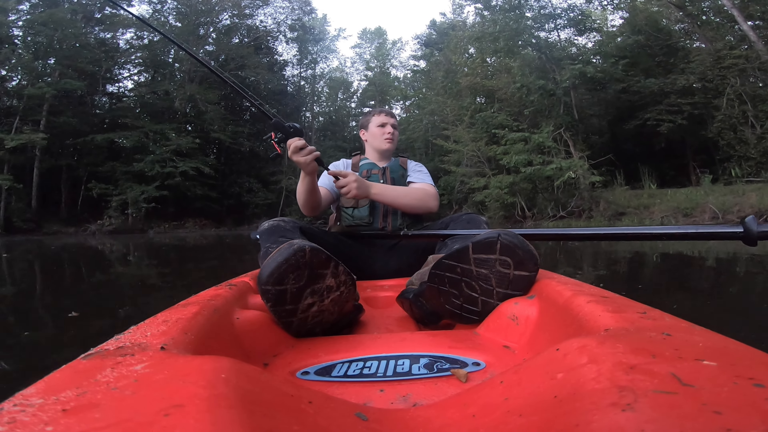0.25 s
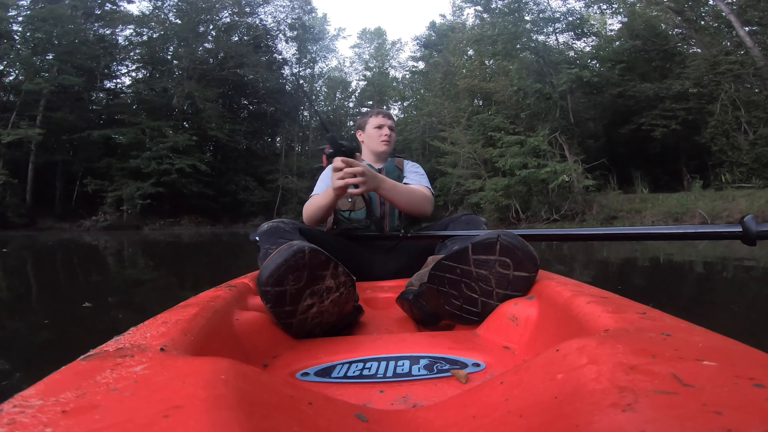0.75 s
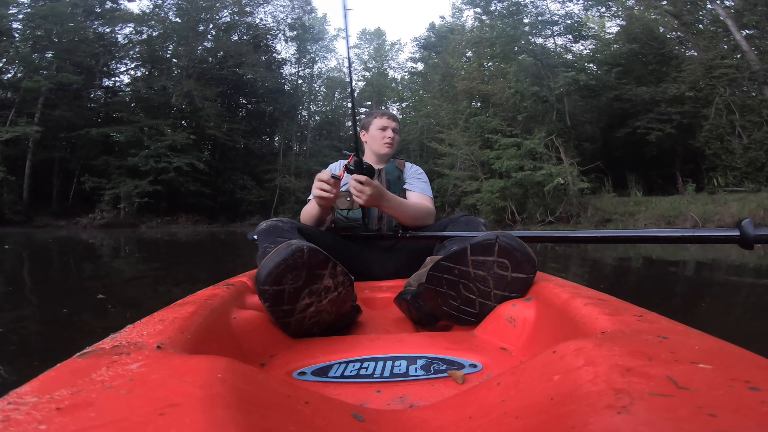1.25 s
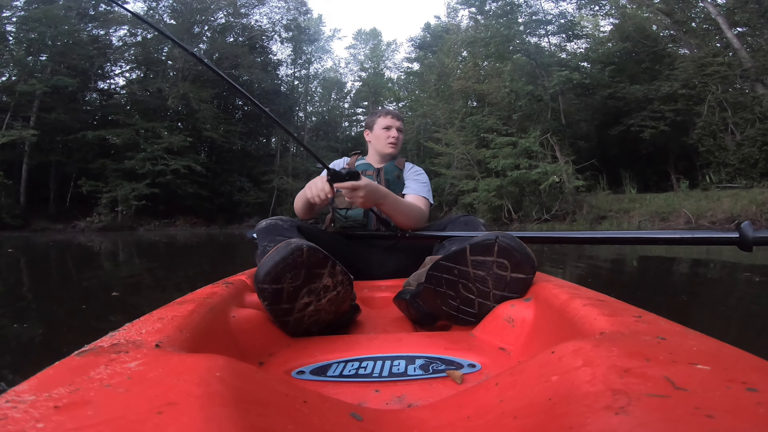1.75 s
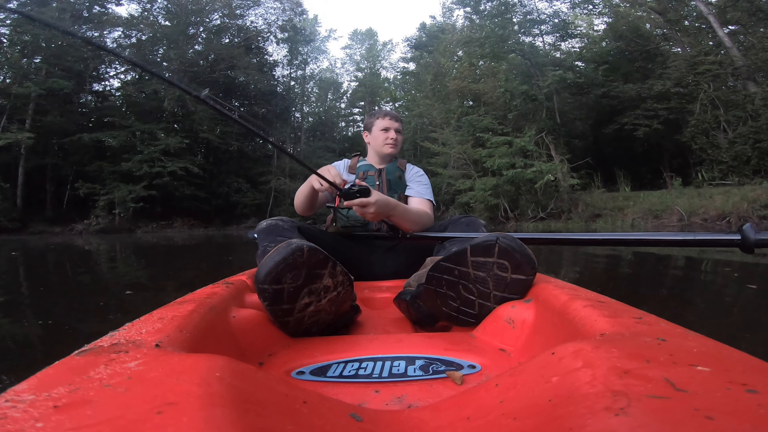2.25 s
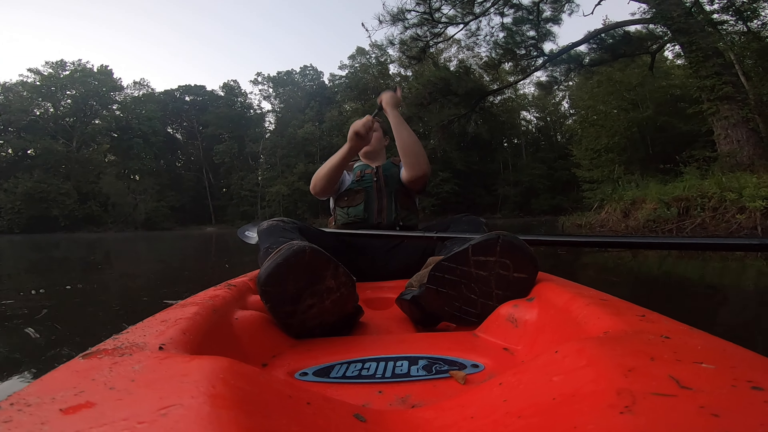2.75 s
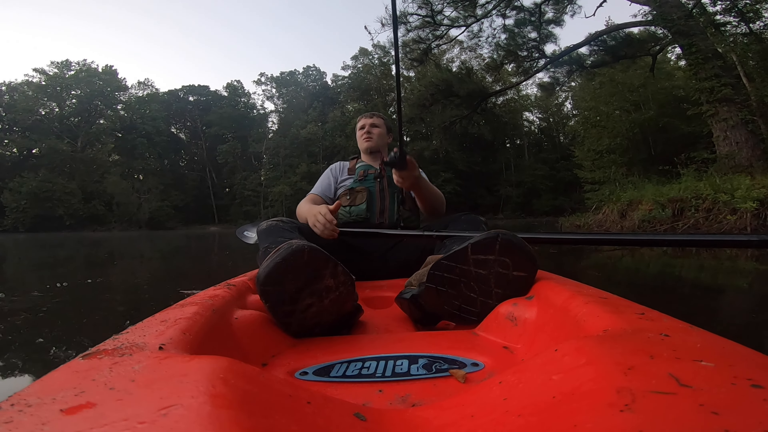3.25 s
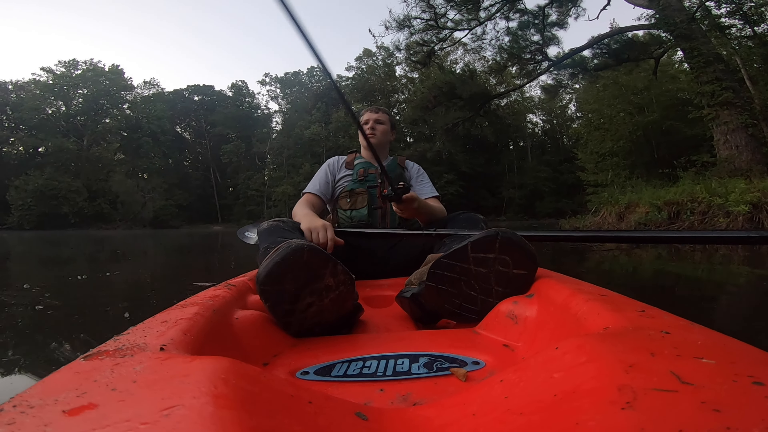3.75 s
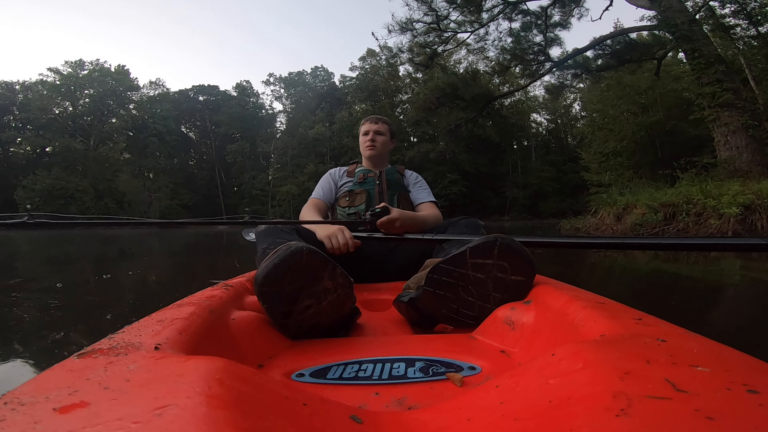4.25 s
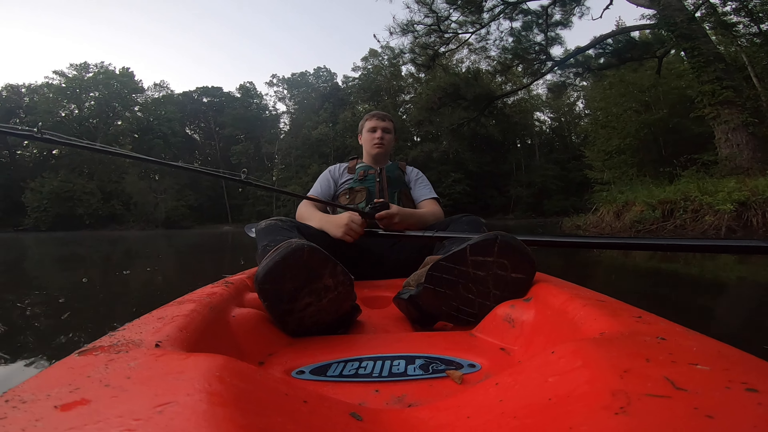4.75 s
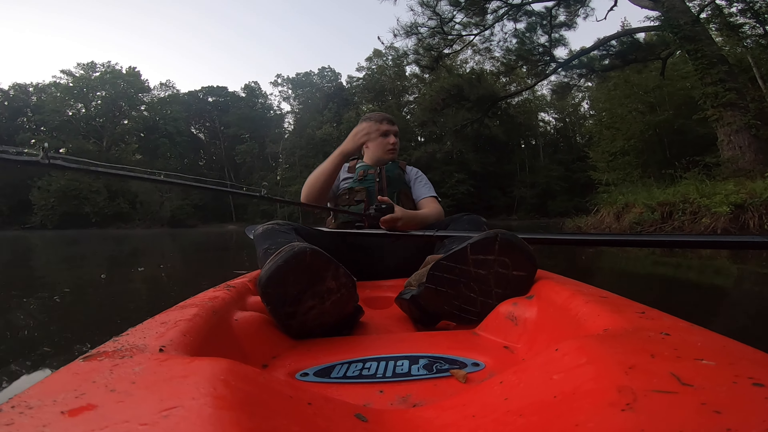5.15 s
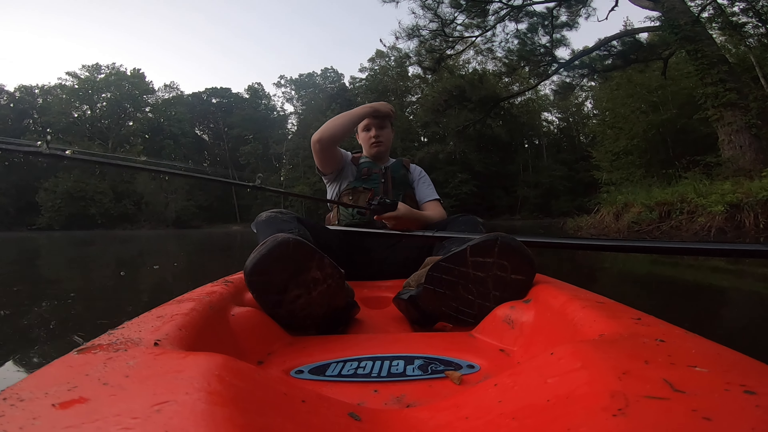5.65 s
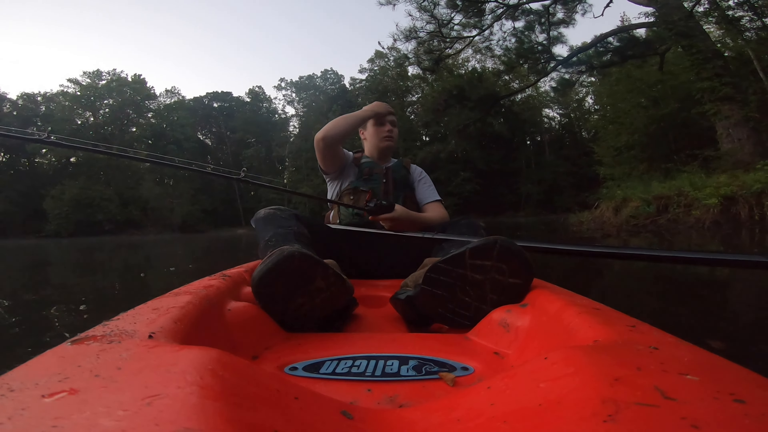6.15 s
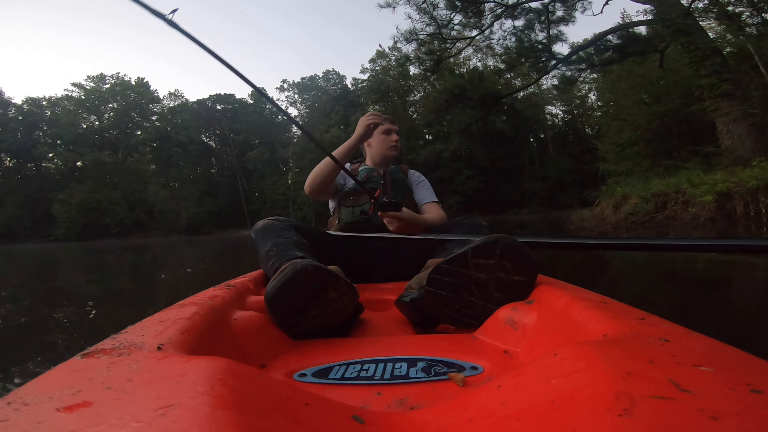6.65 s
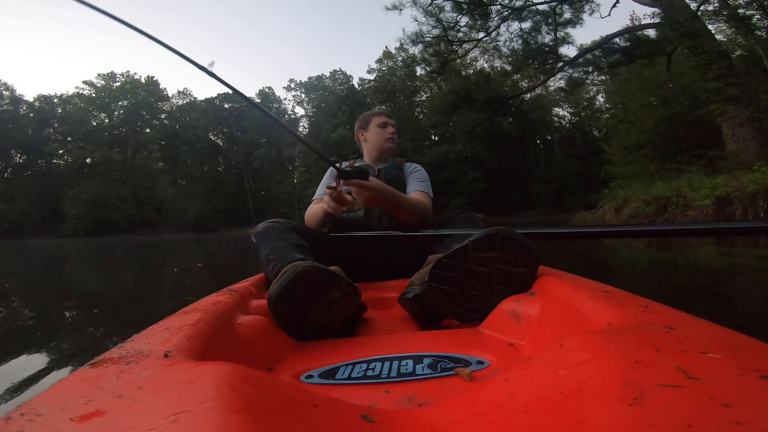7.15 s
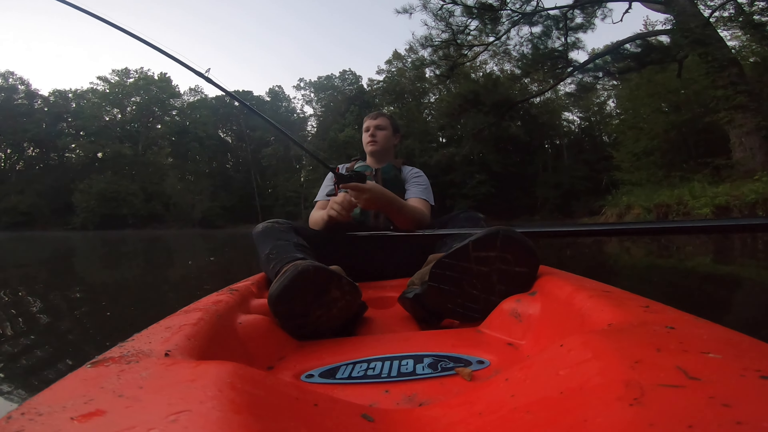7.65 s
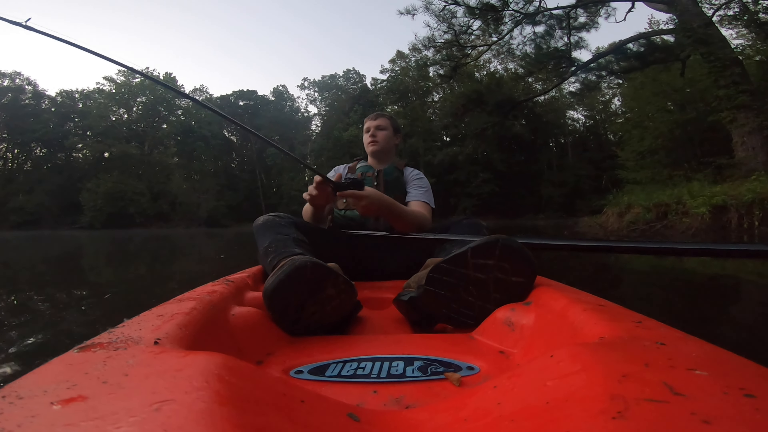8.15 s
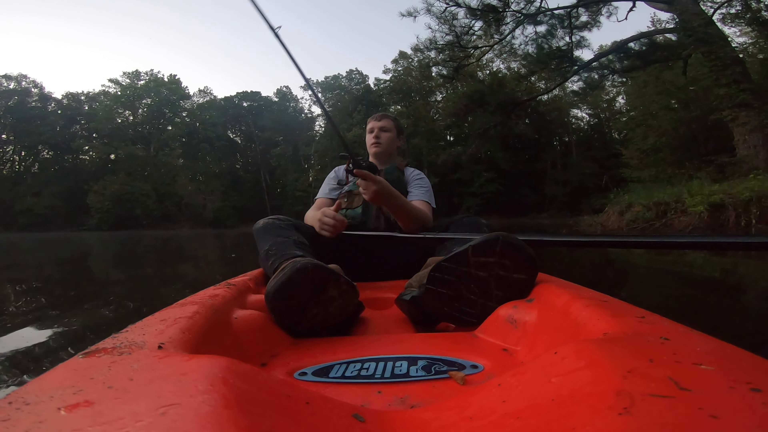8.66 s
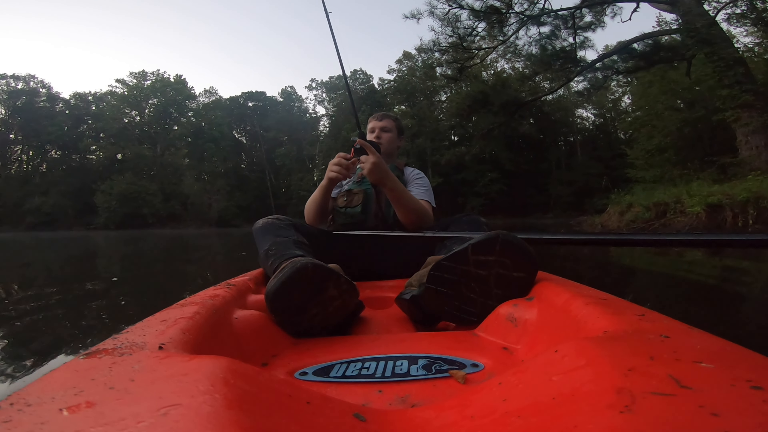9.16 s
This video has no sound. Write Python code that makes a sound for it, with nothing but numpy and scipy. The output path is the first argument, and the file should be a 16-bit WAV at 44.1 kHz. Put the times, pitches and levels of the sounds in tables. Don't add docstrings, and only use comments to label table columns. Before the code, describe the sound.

Quiet morning pond: cricket trill and bird whistles, then a cast's line hiss, a sharp clutch snap, strap squeal with low bumps, and distant crows.

```python
import sys
import numpy as np
from scipy import signal
from scipy.fft import rfft, irfft, next_fast_len
from scipy.io import wavfile
from scipy.ndimage import uniform_filter1d

SR = 44100
rng = np.random.default_rng(int(sys.argv[2]) if len(sys.argv) > 2 else 0)


def master(y):
    cut = np.clip(np.atleast_2d(y).T, -1, 1)
    pcm = np.round(cut * 32767)
    wavfile.write(sys.argv[1], SR, pcm.astype(np.int16))


def field_ratio(decibels):
    return 10 ** (np.asarray(decibels, dtype=float) / 20)


N = 414099
CUT_S = 2.535


def evened(x):
    return x / np.sqrt(np.mean(x ** 2) + 1e-20)


def read(points, hz):
    point_hz, value = np.transpose(points)
    return np.interp(np.log(hz + 1), np.log(point_hz + 1), value)


def band_db(points, hz, lo_hz, hi_hz):
    level_db = read(points, hz)
    inside = (hz >= lo_hz) & (hz < hi_hz)
    return level_db - 10 * np.log10(np.sum(field_ratio(2 * level_db)[inside]))


def add(mix, start_s, sound):
    part = mix[round(start_s * SR):][:len(sound)]
    part += sound[:len(part)]


def dulled(x, edge_hz, order):
    return signal.sosfilt(signal.butter(order, min(edge_hz, .45 * SR), fs=SR, output="sos"), x)


def ring(drive, pitch_hz, level_db, t60_s):
    pole = np.exp((2j * np.pi * pitch_hz - np.log(1000) / t60_s) / SR)
    return field_ratio(level_db) * signal.lfilter([1], [1, -pole], drive + 0j).real


def resonate(x, hz, width_hz):
    turn = np.exp(2j * np.pi * np.cumsum(hz) / SR)
    r = np.exp(-np.pi * width_hz / SR)
    smooth = signal.lfilter([1], np.convolve([1, -r], [1, -r]), x * turn.conj())
    return evened((turn * smooth).real)


def gestures(t, start, hold, rise, fall, db, value, sag=0., calm_db=-120., calm_value=0.):
    grid = np.arange(t[0], t[-1] + .01, max(.0005, (t[-1] - t[0]) / 4000))[:, None]
    away = np.maximum(np.maximum((start - grid) / rise, (grid - start - hold) / fall), 0)
    power, calm = field_ratio(2 * (db - 20 * away)), field_ratio(2 * calm_db)
    total = power.sum(1) + calm
    weighted = (power * (value - sag * (grid - start))).sum(1)
    mixed = (weighted + calm * calm_value) / total
    return np.interp(t, grid[:, 0], 10 * np.log10(total)), np.interp(t, grid[:, 0], mixed)


# pitch_hz, likeness (1 same, -1 opposite)
PORT_LIKENESS = [(60, 0.4), (300, 0.56), (640, -0.09), (1400, -0.2), (2200, 0.46), (4200, 0.93),
                 (5500, 0.83), (6800, -0.62), (15000, 4.5)]


def hiss(field_db, size, patchy_db, flicker_db):
    frames = 4 * N // size + 5
    hz = np.fft.rfftfreq(size, 1 / SR)[:, None]
    a, b, c, d, patches = rng.standard_normal((frames, len(hz), 5)).T
    patches = uniform_filter1d(patches, size=size // 128, axis=0)
    patches = evened(uniform_filter1d(patches, size=6, axis=1))
    flicker = np.minimum(rng.exponential(1, frames), 2.5) - 1
    same = np.clip(read(PORT_LIKENESS, hz), -1, 1)
    left = a + 1j * b
    right = same * left + np.sqrt(1 - same ** 2) * (c + 1j * d)
    ports = np.array([left, right]) / np.sqrt(1 + same)
    level_db = field_db(hz, np.arange(frames) * size / 4 / SR)
    ports = ports * field_ratio(level_db + patchy_db * patches + flicker_db * flicker)
    return signal.istft(ports, nperseg=size, noverlap=3 * size // 4)[1][:, :N] * np.sqrt(2)


def struck(events, modes, share, length_s, spread, detune, size):
    u = np.arange(size) / SR / length_s
    out = np.zeros((2, N))
    for s, db, *columns in events:
        blow = rng.standard_normal(len(u)) + spread * rng.standard_normal((2, len(u)))
        blow = u * np.exp(-u) * blow
        shift = 1 + detune * rng.uniform(-1.23, 1, len(modes))
        sound = sum(ring(blow, hz * k, level_db + share(hz, columns), t60_s)
                    for k, (hz, level_db, t60_s) in zip(shift, modes))
        plain = sum(ring(blow, *mode) for mode in modes if not share(mode[0], [1, 1]))
        for side, port in zip(out, sound):
            add(side, s - length_s / 2, port * field_ratio(db) / abs(plain.mean(0)).max())
    return out


def slides(notes, rough_db, grain_s, skew):
    out = np.zeros(N)
    for s, length_s, start_hz, end_hz, db in notes:
        u = np.linspace(0, 1, int(length_s * SR))
        grain = uniform_filter1d(rng.standard_normal(12000), int(grain_s * SR))
        uneven = field_ratio(rough_db * evened(grain)[:len(u)])
        hz = start_hz + (end_hz - start_hz) * u
        add(out, s, field_ratio(db) * uneven * np.sin(np.pi * u ** skew) * np.sin(2 * np.pi * np.cumsum(hz) / SR))
    return out


# pitch_hz, level_db, t60_s
REEL_MODES = [(727, -1, 0.034), (1210, 3.5, 0.0067), (1650, -14, 0.0082), (2900, -2.5, 0.011),
              (3240, -5, 0.0071), (4200, -3, 0.0022), (6200, -11, 0.0043), (8030, 3.5, 0.0044),
              (8630, 3, 0.009)]
# time_s, peak_db, low_modes_db, high_modes_db
TICKS = [(0.24, -62, -7, 22), (0.3044, -62, -3, -9), (0.8893, -44.5, -29, -9), (2.1995, -37.5, -11, -24),
         (4.0094, -59, 15, -28), (4.3246, -44, 5.5, -36), (4.328, -49, 7.5, -30), (4.333, -55.5, 13, -30),
         (4.8302, -36, -14, -13), (5.236, -50, -20, -5), (5.247, -45, -22, -4), (5.2684, -45.5, -12, -2),
         (5.2833, -46, -8.5, 4), (5.3135, -48, -12, -6), (5.3403, -48, -12, -3), (5.3773, -39.5, 0, 0),
         (6.2882, -40, -13, -12), (6.558, -56.5, 4, 5), (7.0843, -51, -5, 4), (7.1152, -52.5, 5, -14),
         (7.1761, -56, 7, 14), (7.2234, -61, 9, 15), (7.978, -55, -20, -10), (8.019, -44, -8, -3),
         (8.023, -44, -12, -6), (8.048, -55, -8, -10)]
# time_s, peak_db, low_modes_db, high_modes_db
CLUTCH_SNAPS = [
    (2.148, -33, -0.5, 10.5),
    (2.1534, -20, -9.5, 0.5),
    (2.162, -41.5, 10, -15),
    (4.7654, -31, -20, 14),
    (4.769, -28, -7, 4),
    (4.7737, -21, -17, 0),
    (4.785, -47, 8, 4),
]


def clicks():
    def share(hz, columns):
        return columns[0] * (hz < 1600) + columns[-1] * (hz > 7000)
    ticks = struck(TICKS + CLUTCH_SNAPS, REEL_MODES, share, length_s=.0008, spread=.3, detune=.035, size=1200)
    thin = ticks - dulled(ticks, edge_hz=1360, order=1)
    return field_ratio(7.0) * dulled(thin, edge_hz=6030, order=3)


# pitch_hz, level_db_per_hz
LINE_SPECTRUM = [(880, -51), (1500, -21), (1960, -7), (2710, -1.5), (3980, 1.5), (4800, 0.5), (5620, -6),
                 (6770, 1), (8580, 4), (11600, -24), (15800, -27)]


def spool():
    cast_s, cast_rise_s, cast_fall_s, cast_db = 2.86, 0.079, 0.15, -43.5
    run_s, run_rise_s, run_end_s, run_stop_s, run_db = 3.05, 0.46, 4.0, 0.025, -55.5
    whistle_start_hz, creep_hz_per_s, rod_hum_db, rod_still_s = 8320, 410, 9.5, 3.4
    start, hold = np.array([cast_s, run_s]), np.array([0, run_end_s - run_s])
    rise, fall = np.array([cast_rise_s, run_rise_s]), np.array([cast_fall_s, run_stop_s])

    def field(hz, t):
        level_db = gestures(t, start, hold, rise, fall, np.array([cast_db, run_db]), 0)[0]
        whistle_hz = whistle_start_hz + creep_hz_per_s * abs(t - run_s)
        whistle_db = 6 * np.exp(-((hz - whistle_hz) / 600) ** 2)
        whip = np.maximum((rod_still_s - t) / 0.036, (t - 3.5) / 0.5)
        hum_db = rod_hum_db * np.clip(whip, .3, 1) * np.exp(-((hz - 2900) / 550) ** 2)
        return band_db(LINE_SPECTRUM, hz, 8200, 10500) + level_db - 5.0 + whistle_db + hum_db
    return hiss(field, size=256, patchy_db=3.0, flicker_db=2.0)


# pitch_hz, level_db, t60_s
SHELL_MODES = [(853, -18, 0.03), (1060, -13, 0.025), (1200, -7.5, 0.036), (1690, -10, 0.021),
               (2200, -1, 0.008), (2700, -5, 0.0072), (3370, 1, 0.0064), (4100, -9.5, 0.0065),
               (4900, -25, 0.0065)]
# peak_s, fall_s, level_db
STRAP_SLIPS = [
    (5.7126, 0.0054, -10),
    (5.7212, 0.021, -12.5),
    (5.73, 0.13, -16.5),
]


def strap():
    free_s, free_db_per_s = 5.78, 1100
    out = np.zeros((2, N))
    t = np.arange(STRAP_SLIPS[0][0] - .01, free_s + .1, 1 / SR)
    s, fall, db = np.transpose(STRAP_SLIPS)
    noise = rng.standard_normal(len(t))
    catches = (rng.random(len(t)) < 900 / SR) * np.minimum(rng.exponential(1, len(t)), 2.5)
    level_db = gestures(t, s, 0, 0.0037, fall, db, 0)[0] - free_db_per_s * (t - free_s).clip(0, 1)
    drive = noise * (0.63 + 1.05 * catches) * field_ratio(level_db - 20.5)
    modes = [ring(drive, *mode) for mode in SHELL_MODES]
    low, high = sum(modes[:3]), sum(modes[3:]) + 1.2 * drive
    across = 2.6 * np.roll(low, 9)
    ports = np.array([high + low + across, high + low - across])
    for side, port in zip(out, dulled(ports, edge_hz=5530, order=3)):
        add(side, t[0], port)
    return out


# start_s, length_s, start_hz, end_hz, level_db
SQUEAL_STRANDS = [(5.711, 0.0055, 3140, 3200, -16), (5.72, 0.015, 1042, 1200, -24),
                  (5.723, .016, 2200, 2245, -23.5), (5.723, .017, 3250, 3550, -17),
                  (5.723, .014, 4350, 4700, -25), (5.738, .02, 1190, 1250, -29),
                  (5.741, 0.015, 2250, 2170, -22), (5.742, 0.028, 3120, 2880, -21.5),
                  (5.762, 0.017, 885, 754, -29), (5.764, 0.029, 2224, 2096, -27),
                  (5.765, 0.02, 3470, 3220, -27), (5.452, 0.053, 1320, 1357, -41),
                  (5.462, 0.03, 2010, 2020, -43), (6.284, 0.025, 2900, 2900, -42.5),
                  (6.19, 0.15, 1355, 1330, -53), (5.895, .04, 2150, 2230, -71)]
# start_s, length_s, start_hz, end_hz, level_db
PITCHED_TINKS = [(.268, 0.028, 2050, 1900, -61), (.3, 0.012, 720, 700, -53), (.76, .016, 760, 640, -61),
                 (1.722, 0.0065, 716, 700, -54), (1.789, .003, 900, 800, -53), (.295, .02, 2100, 1900, -57),
                 (1.844, .004, 890, 750, -55), (2.1465, .004, 8950, 8300, -33.5),
                 (2.154, 0.0039, 8370, 7560, -23.5), (2.155, 0.0073, 900, 650, -37.5),
                 (3.78, 0.0022, 8640, 8640, -36), (4.006, 0.012, 1360, 1290, -42.5),
                 (4.2, .0015, 2600, 2500, -50), (4.291, .0015, 4200, 4200, -51),
                 (4.306, 0.0021, 5000, 5260, -55), (4.371, 0.0018, 2400, 2360, -51),
                 (4.371, 0.0018, 4860, 4700, -54), (4.418, 0.0025, 4350, 4300, -48),
                 (4.624, .0015, 4900, 4900, -57), (4.7645, 0.0027, 9060, 8250, -21),
                 (4.765, 0.0063, 1400, 1150, -26.5), (4.772, 0.0068, 2750, 2820, -23),
                 (4.784, .008, 1450, 1320, -34), (4.83, .005, 7900, 7900, -44),
                 (4.936, 0.0036, 1090, 900, -40.5), (8.018, .015, 3100, 2900, -50),
                 (8.23, .06, 2700, 2640, -62), (8.3, 0.064, 2980, 3050, -61), (8.32, .04, 4200, 4400, -64)]
# start_s, length_s, start_hz, end_hz, level_db
HULL_HEAVES = [(.93, 0.12, 140.5, 145, -48), (.95, 0.13, 100, 65, -57), (1.2, .1, 170, 140, -58.5),
               (1.33, 0.15, 75, 70, -62), (1.57, 0.18, 75, 74.4, -60), (4.36, 0.038, 90, 60, -46.5),
               (5.41, .035, 110, 99.2, -24.5), (5.445, 0.051, 150, 130, -27), (5.68, 0.045, 139, 140, -28),
               (6.298, 0.035, 115, 84.9, -25.5), (6.2, .1, 330, 300, -43.5), (6.65, 0.09, 70, 70, -52.5),
               (6.76, 0.092, 70, 55, -54), (7.24, 0.065, 109, 90, -54.5), (7.95, .1, 75, 71, -58)]
# start_s, peak_db
DRY_TICKS = [(8.335, -79), (8.5136, -74), (8.6523, -75), (8.7914, -72), (9.0239, -72), (9.1506, -70),
             (9.3, -77), (9.365, -76)]


def small_parts():
    puffs, t = np.zeros((2, N)), np.arange(3000) / SR
    for s, db in DRY_TICKS:
        for side in puffs:
            envelope = field_ratio(db - 60 * t / .14) * np.minimum(t / .006, 1)
            add(side, s, envelope * rng.standard_normal(len(t)))
    thin = signal.sosfilt(signal.butter(5, [10000, 15300], "band", fs=SR, output="sos"), puffs)
    heaves = slides(HULL_HEAVES, rough_db=1.5, grain_s=.02, skew=0.68)
    squeal = slides(SQUEAL_STRANDS, rough_db=2.5, grain_s=0.0015, skew=0.8)
    squeal = dulled(squeal, edge_hz=5500, order=4)
    across = 1.5 * np.roll(dulled(squeal, edge_hz=1460, order=4), 5)
    tinks = slides(PITCHED_TINKS, rough_db=2.0, grain_s=0.0014, skew=0.72)
    pitched = np.array([squeal + across, squeal - across]) + tinks
    return pitched + thin + np.array([.8 * heaves, 0.91 * np.roll(heaves, 40)])


# peak_s, rise_s, fall_s, level_db, pitch_hz
MOUNT_JOLTS = [(0.988, 0.2, .06, -51.5, 110), (4.36, 0.028, .1, -49.5, 55.3), (4.85, 0.94, 0.46, -62, 54.8),
               (5.415, 0.064, .2, -30, 95.2), (5.551, .3, .2, -37.5, 61.82), (5.69, 0.027, .3, -36, 71.4),
               (5.9, .5, .04, -41.5, 50.8), (6.31, 0.031, .04, -22.5, 85.4),
               (6.334, 0.04, .12, -29.5, 56.1), (6.49, .2, .055, -44, 45.6), (7.32, 0.11, .12, -53.5, 69),
               (8.5, 0.085, .1, -58, 74.6)]


def rocking():
    s, rise, fall, db, pitch_hz = np.transpose(MOUNT_JOLTS)
    sag_hz_per_s = 81
    t = np.arange(N) / SR
    level_db, hz = gestures(t, s, 0, rise, fall, db, pitch_hz, sag_hz_per_s, calm_value=50)
    fuzz = resonate(rng.standard_normal(N), hz, 46)
    out = field_ratio(level_db) * (0.64 * np.sin(2 * np.pi * np.cumsum(hz) / SR) + .5 * fuzz)
    return np.array([-2.3 * out, 3.3 * np.roll(out, 15)])


# pitch_hz, level_db, t60_s
HULL_MODES = [(183.2, 6, 0.24), (234, 7.5, 0.046), (330, -8, 0.055), (497, 2, 0.038), (583, -6.5, 0.087),
              (742, -28, 0.061)]
# time_s, peak_db, upper_modes_db
HULL_KNOCKS = [(0.178, -44.5, -26), (0.237, -47.5, -27), (0.826, -52, -28), (1.322, -61, 17.5),
               (1.569, -41, 1), (2.678, -55, -9), (2.712, -48.5, -4), (2.768, -40.5, -16),
               (2.819, -43.5, -1), (3.687, -41.5, -70), (4.494, -38, -2), (4.525, -44.5, -8),
               (4.702, -51, -43), (5.981, -75, 5), (1.37, -60, 14), (1.42, -66.5, 17.5), (6.653, -43.5, -4),
               (6.717, -43.5, -2), (7.248, -46, 3), (7.578, -41, -0.5), (7.625, -40, 4.5),
               (7.875, -38, -4.5), (8.198, -39.5, -1.5), (8.312, -40.5, -5.5), (8.391, -49.5, -4.5),
               (8.818, -48.5, -10)]


def knocks():
    def share(hz, columns):
        return (hz > 300) * (columns[0] + 4.2)
    blows = struck(HULL_KNOCKS, HULL_MODES, share, length_s=0.01402, spread=1.0, detune=0.067, size=8000)
    blows = blows - dulled(blows, edge_hz=90, order=1)
    return field_ratio(3.0) * dulled(blows, edge_hz=830, order=4)


# pitch_hz, level_db_per_hz
RUB_SPECTRUM = [(150, -20), (250, -1), (300, -4.5), (520, -12.5), (1070, -12), (1320, -8.5), (1840, -16.5),
                (2000, -14), (6870, -23), (9720, -33.5), (15800, -75)]
# peak_s, rise_s, fall_s, level_db, low_share_db
RUBS = [(.05, .4, 0.027, -55.5, -18), (.29, 0.17, 0.17, -65, 2.5), (1.36, 0.077, 0.23, -62.5, 5),
        (1.578, 0.13, .2, -68, 15), (2.18, .02, 0.14, -61, 0), (2.8, 0.13, 0.63, -61, 11),
        (2.9, 0.22, .7, -61.5, -2.5), (4.08, 11, 0.5, -71.5, 8.5), (4.799, 0.081, 0.27, -62, -4),
        (4.95, 0.53, 0.13, -63, 10), (5.25, 0.045, 0.43, -59.5, 1), (5.45, 0.16, 0.19, -47, 12),
        (5.69, 0.053, 0.41, -54.5, 13.5), (5.799, 0.34, 0.043, -51.5, 14.5), (5.99, 0.062, .25, -69, 14),
        (4.014, 0.034, 0.036, -53.5, 2), (6.211, 0.057, 0.17, -61, 3), (6.295, 0.1, 0.041, -46, 12),
        (7.07, 0.11, 0.89, -66, 6.5), (7.54, 2.2, .12, -73, 14), (8.028, 0.02, 0.047, -59.5, 4.5),
        (8.23, 0.046, 0.27, -60, -9), (8.33, 0.2, 0.56, -67.5, 4)]


def rustle():
    s, rise, fall, db, low = np.transpose(RUBS)
    calm_db, calm_low_db = -84, 4.5

    def field(hz, t):
        level_db, low_db = gestures(t, s, 0, rise, fall, db, low, 0, calm_db, calm_low_db)
        lowness = np.clip(np.log2(1800 / (hz + 1)), 0, 1)
        return band_db(RUB_SPECTRUM, hz, 1900, 2900) + level_db + lowness * (low_db - 6.0)
    return hiss(field, size=256, patchy_db=3.0, flicker_db=0.7)


# peak_s, rise_s, fall_s, level_db
WEIGHT_SHIFTS = [
    (5.45, 0.21, 0.22, -33),
    (5.71, 0.22, 0.24, -37),
    (6.305, 0.11, 0.072, -31.5),
]


def hull_hum():
    s, rise, fall, db = np.transpose(WEIGHT_SHIFTS)
    hum_calm_db, swell_calm_db, swell_shaken_db, swell_early_db = -62, -23, -13, 10.5

    def field(hz, t):
        level_db, swell_db = gestures(t, s, 0, rise, fall, db, swell_shaken_db, 0, hum_calm_db, swell_calm_db)
        mode_hz = 178 - 2.0 * (level_db - hum_calm_db)
        mode = np.exp(-((hz - mode_hz) / 38) ** 2)
        swell = np.exp(-((hz - 66) / 24) ** 2)
        swell_power = field_ratio(2 * (swell_db + swell_early_db * (t < CUT_S))) * swell / swell.sum()
        return level_db - .7 + 10 * np.log10(mode / mode.sum(0) + swell_power + 1e-12)
    return hiss(field, size=2048, patchy_db=1.0, flicker_db=.4)


# first_pulse_s, last_pulse_s
TRILL_PHRASES = [(.0124, .2385), (.2528, .505), (.519, .5643), (.5874, .6209), (.6441, .6884),
                 (.7115, .7447), (.7675, .8113), (.8342, .8784), (.901, 1.0237), (1.0476, 1.1023),
                 (1.1262, 1.1926), (1.216, 1.272), (1.2955, 1.341), (1.3652, 1.4247), (1.4528, 1.5402),
                 (1.5696, 1.8063), (1.8205, 2.0605), (2.0746, 2.3024), (2.3158, 2.5277)]


def cricket():
    slow_per_s, fast_per_s, fast_from_s, fast_to_s = 75.2, 90, .51, 1.44
    trill_db, fade_db_per_s, first_stroke_db, echo_db = -44, 0.7, -11, -13
    out, t = np.zeros(N), np.arange(int(0.0078 * SR)) / SR
    for first, last in TRILL_PHRASES:
        fast = fast_from_s < first < fast_to_s
        rate = fast_per_s if fast else slow_per_s
        early = first - fast / rate * (first > .55)
        times = np.linspace(early, last, round((last - early) * rate) + 1)
        for k, s in enumerate(times):
            hz = (6520 - 880 * (t / t[-1]) ** 1.17) * (1 + 0.0012 * rng.standard_normal())
            stroke = np.sin(2 * np.pi * (np.cumsum(hz) / SR + rng.random())) * np.hanning(len(t)) ** 0.55
            start_db = first_stroke_db * np.exp(-k / 1.3) * fast
            level_db = trill_db - fade_db_per_s * s + start_db + 1.3 * rng.standard_normal()
            add(out, s - t[-1] / 2, stroke * field_ratio(level_db))
    leaves = rng.standard_normal(900) * field_ratio(-60 * np.arange(900) / SR / 0.048)
    out = out + field_ratio(echo_db) * signal.oaconvolve(out, leaves / np.linalg.norm(leaves))[:N]
    turned = signal.hilbert(out, next_fast_len(N))[:N].imag
    return np.array([out - turned, out + turned])


# start_s, length_s, top_hz, level_db
ARCHED_NOTES = [(1.188, .105, 1345, -55), (1.495, .11, 1350, -53.5), (1.922, .1, 1345, -55.5),
                (3.077, .18, 670, -62.5), (1.013, .028, 4950, -64)]
# start_s, length_s, start_hz, end_hz, level_db
GLIDING_NOTES = [(2.484, .048, 1130, 1420, -53), (1.17, .045, 1350, 1950, -67),
                 (1.27, .04, 1750, 1400, -64), (1.48, .05, 1400, 1950, -65), (1.915, .035, 1400, 1800, -67),
                 (2.0, .05, 1450, 1550, -61), (.21, .26, 1600, 1590, -65), (.5, .25, 1590, 1580, -75),
                 (7.72, .15, 1260, 1140, -61), (.665, .03, 740, 750, -61), (.695, .035, 780, 1020, -65),
                 (.57, .022, 1000, 940, -61), (.595, .04, 1400, 1550, -68), (1.94, .26, 590, 570, -67.5),
                 (2.53, .064, 2400, 1600, -69), (8.12, .07, 2780, 3050, -70), (8.705, .08, 2250, 2200, -71),
                 (8.78, .055, 2200, 1550, -71), (8.5, .04, 3900, 4800, -74), (8.577, .04, 2630, 2850, -70),
                 (8.612, .065, 2850, 2900, -70), (9.05, .04, 2550, 2820, -71),
                 (9.085, .055, 2820, 2850, -71), (8.97, .04, 3900, 4800, -75), (9.18, .07, 2180, 2230, -69),
                 (9.245, .035, 2200, 1700, -70), (5.965, .06, 330, 300, -53)]


def birds():
    top_at = .4
    out = np.zeros(N)
    notes = [(s, length, .8 * hz, hz, .81 * hz, db) for s, length, hz, db in ARCHED_NOTES]
    for s, length, a, b, db in GLIDING_NOTES:
        notes.append((s, length, a, (a + b) / 2 - (.5 - top_at) * (b - a), b, db))
    for s, length, *pitch_hz, db in notes:
        u = np.linspace(0, 1, int(length * SR))
        hz = uniform_filter1d(np.interp(u, [0, top_at, 1], pitch_hz), len(u) // 4, mode="nearest")
        air = evened(uniform_filter1d(rng.standard_normal(len(u)), size=300))
        flutter = field_ratio(2.45 * air)
        tone = np.sin(2 * np.pi * np.cumsum(hz) / SR) * signal.windows.tukey(len(u), .35)
        add(out, s, field_ratio(db + 1.5) * flutter * tone)
    tail = rng.standard_normal((2, SR // 2)) * field_ratio(-60 * np.arange(SR // 2) / SR / 1.2)
    echo = signal.fftconvolve(out[None], tail / np.linalg.norm(tail[0]), axes=1)[:, :N]
    return out + field_ratio(-8) * echo


# start_s, hold_s, level_db, throat_hz
CROW_CALLS = [(1.26, 0.22, -65, 1316), (1.588, 0.25, -67, 1350), (1.974, 0.04, -56.5, 1250),
              (2.42, .15, -59, 1345), (6.44, 0.17, -57, 1295), (6.624, 0.35, -60.5, 1346),
              (7.053, 0.34, -56, 1306), (7.474, 0.17, -57.5, 1350), (7.72, 0.13, -57.5, 1290),
              (8.008, 0.66, -60, 1342), (8.925, 0.54, -62, 1330)]


def crows():
    rise_s, fall_s, sag_hz_per_s = 0.098, 0.3, 184
    t = np.arange(N) / SR
    s, hold, db, throat_hz = np.transpose(CROW_CALLS)
    sag = sag_hz_per_s * (hold < .45)
    level_db, hz = gestures(t, s, hold, rise_s, fall_s, db, throat_hz, sag, calm_value=1300)
    level_db = np.where((t > CUT_S) & (t < 2 * CUT_S), -120, level_db)
    air = rng.standard_normal((2, N))
    main = resonate(air, hz, 174)
    upper = resonate(air, 1.317 * hz, 190)
    return field_ratio(level_db + 1.0) * (main + field_ratio(-8.5) * upper)


# pitch_hz, level_db_per_hz
EARLY_AIR = [(30, -23), (105, -4), (300, 2), (600, 12.5), (1300, 4), (2000, -33), (2700, 10), (4500, 4),
             (5300, 6.5), (8300, -23), (9500, -17), (11000, -7), (15800, -23)]
# pitch_hz, level_db_per_hz
LATE_AIR = [(30, -9), (105, 0), (300, 0.5), (600, 3), (1300, -3.5), (2000, -46.5), (2700, -2), (4500, -3.5),
            (5300, -20), (8300, -33), (9500, -21), (10700, -29), (15800, -39)]
# pitch_hz, width_hz, early_db, late_db
INSECT_BANDS = [(3580, 340, -62, -64.5), (7200, 720, -54.5, -57.5), (6200, 420, -66, -66),
                (8900, 900, -70, -72), (6650, 160, -65, -64.5), (8600, 130, -80, -75.5)]


def chorus():
    def field(hz, t):
        early = t < CUT_S
        early_air_db = band_db(EARLY_AIR, hz, 0, SR) - 70
        late_air_db = band_db(LATE_AIR, hz, 0, SR) - 69
        power = field_ratio(2 * np.where(early, early_air_db, late_air_db))
        for pitch_hz, width_hz, early_db, late_db in INSECT_BANDS:
            hump = np.exp(-abs((hz - pitch_hz) / width_hz) ** 3)
            power = power + field_ratio(2 * np.where(early, early_db, late_db)) * hump / hump.sum()
        return 10 * np.log10(power)
    return hiss(field, size=512, patchy_db=1.5, flicker_db=0.0)


def scene():
    angler = clicks() + spool() + strap() + small_parts() + rustle()
    boat = rocking() + knocks() + hull_hum()
    pond = cricket() + birds() + crows() + chorus()
    return angler + boat + pond


def low_pass(x):
    return signal.sosfilt(signal.butter(12, 16510, fs=SR, output="sos"), x)


# pitch_hz, left_minus_right_db
PORT_BALANCE = [(60, -5), (110, 0), (200, 2.5), (380, 2.5), (700, -0.5), (1290, -0.5), (2380, 1),
                (4400, -2), (8120, -13.5), (15000, -27)]


def record(dry):
    size = next_fast_len(N)
    lean = field_ratio(read(PORT_BALANCE, np.fft.rfftfreq(size, 1 / SR)) / 2)
    gain = np.array([lean, 1 / lean]) * 2 / (lean + 1 / lean)
    mix = irfft(rfft(dry, size) * gain, size)[:, :N]
    return low_pass(mix)


dry = scene()
out = record(dry)
master(out)
```